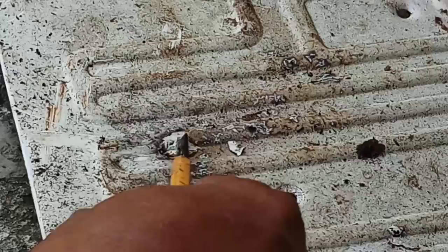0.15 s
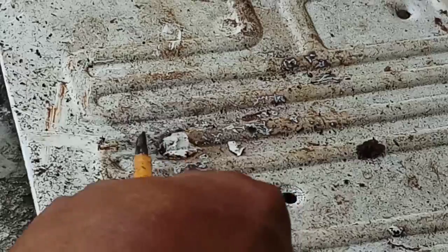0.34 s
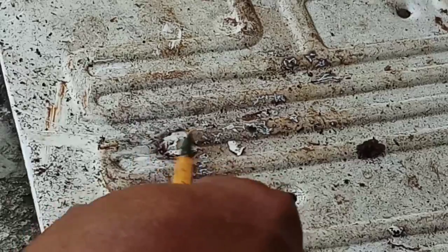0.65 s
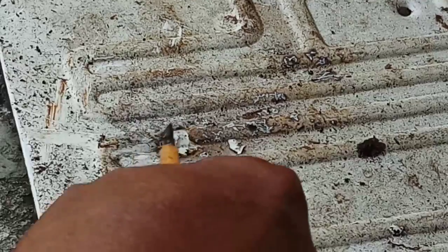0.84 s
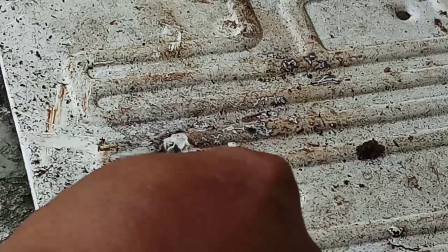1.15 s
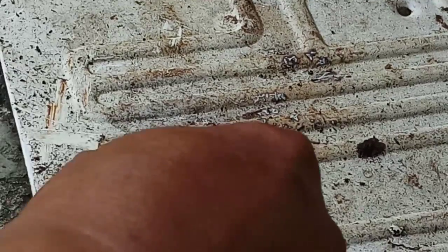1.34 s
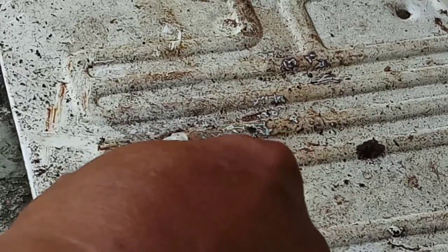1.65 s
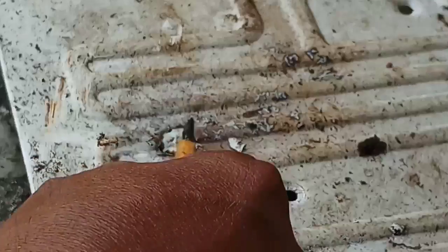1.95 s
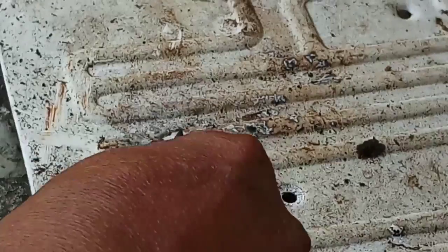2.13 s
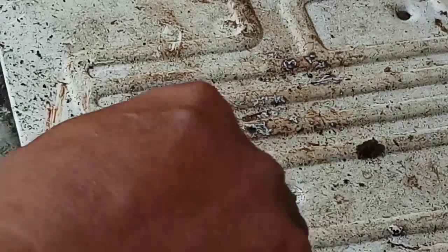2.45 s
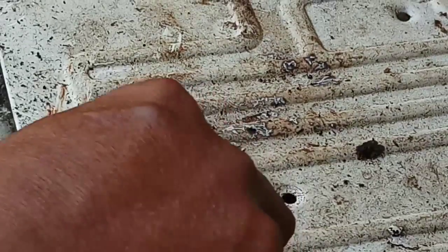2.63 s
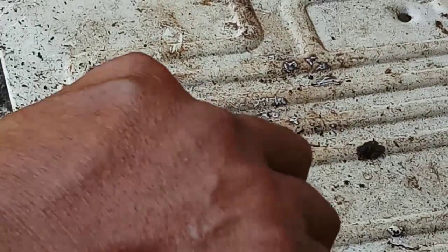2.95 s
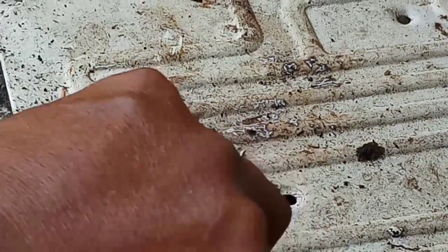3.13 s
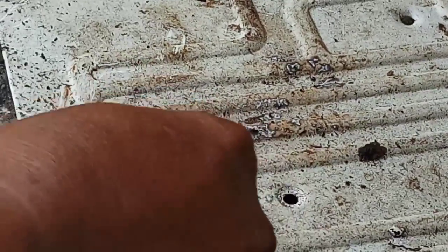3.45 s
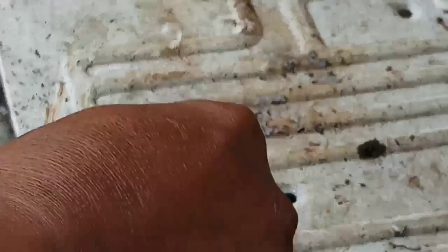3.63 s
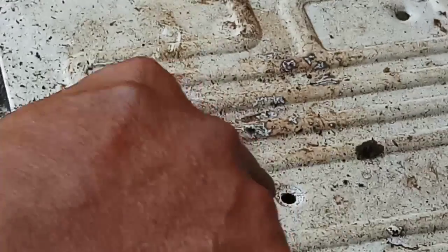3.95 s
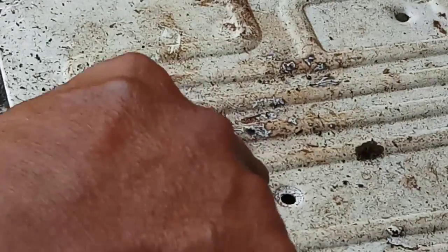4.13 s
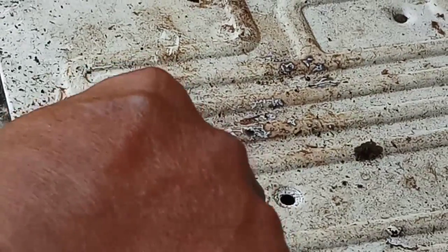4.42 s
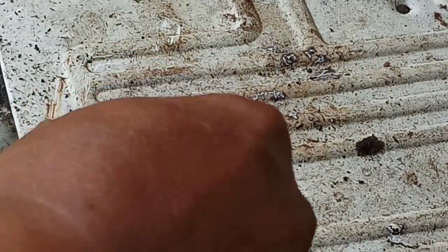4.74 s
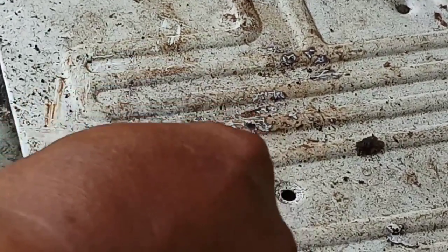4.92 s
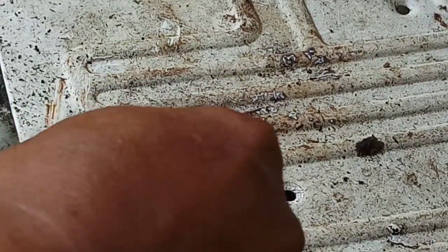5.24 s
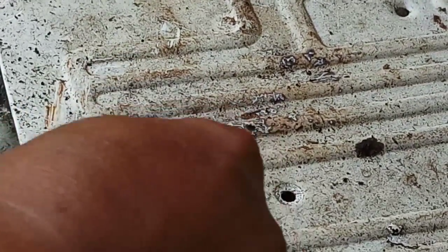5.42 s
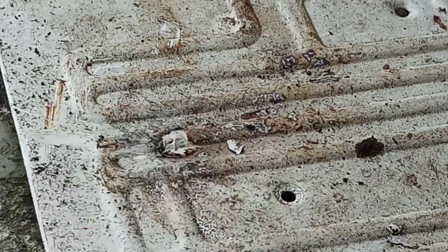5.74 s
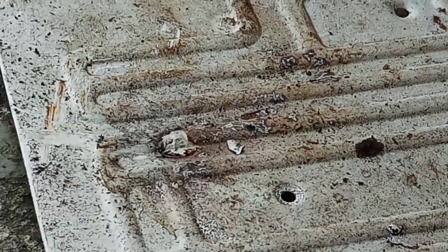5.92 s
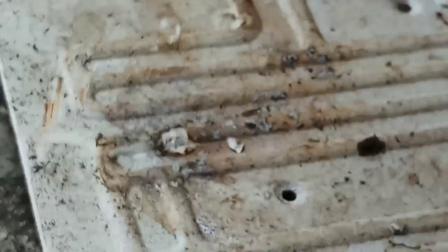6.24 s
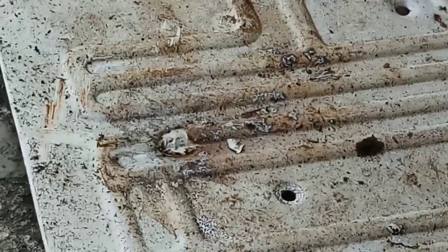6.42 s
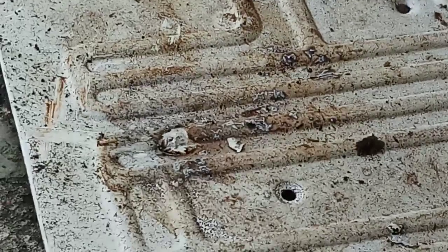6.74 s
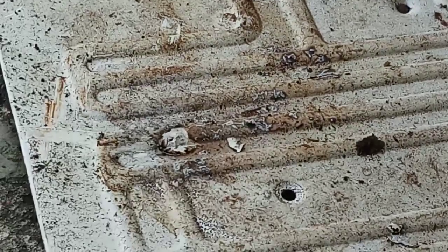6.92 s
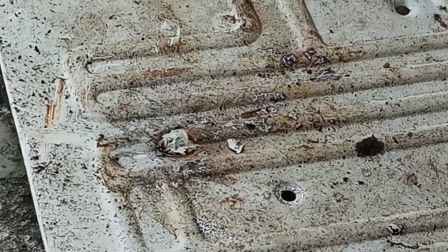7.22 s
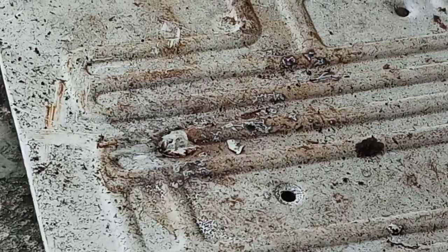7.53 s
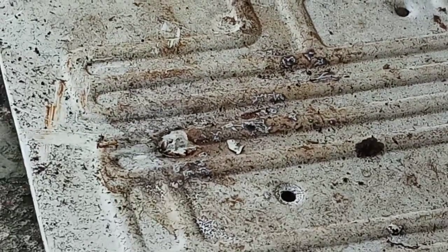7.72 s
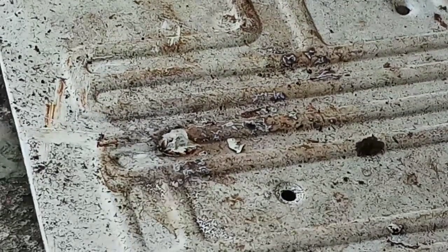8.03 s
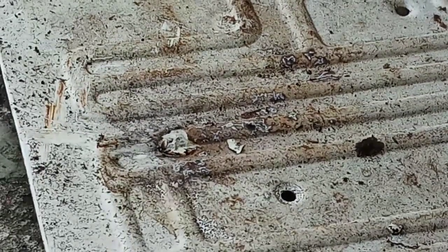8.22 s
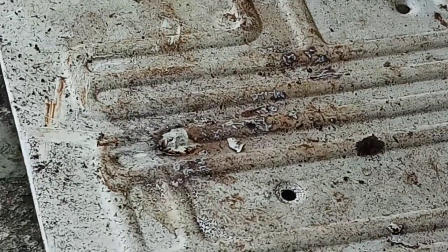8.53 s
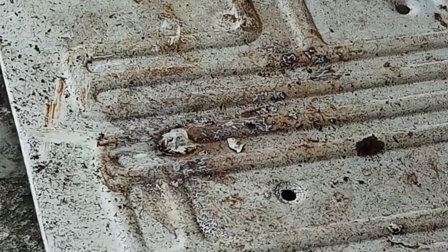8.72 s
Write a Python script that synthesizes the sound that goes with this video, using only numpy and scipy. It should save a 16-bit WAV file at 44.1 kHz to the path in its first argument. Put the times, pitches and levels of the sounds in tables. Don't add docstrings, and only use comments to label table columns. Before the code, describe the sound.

A steady, slightly fluttering cricket trill dominates a quiet yard, over light hiss, breeze rumble and distant hum. Very high, thin chirps repeat early and then stop. A hand works a small tool on cast metal: sparse dry ticks and short gritty drags at first, a busy flurry around five seconds, then scattered faint touches and light rustling. The level is low and the microphone close to the plate.

```python
import sys
import numpy as np
from scipy import signal
from scipy.fft import rfft, irfft, next_fast_len
from scipy.io import wavfile
from scipy.ndimage import uniform_filter1d

SR = 44100
rng = np.random.default_rng(int(sys.argv[2]) if len(sys.argv) > 2 else 0)


def generate_wav(signal):
    frames = np.transpose(np.atleast_2d(signal))
    scaled = np.clip(frames, -1, 1) * 32767
    pcm = np.round(scaled).astype(np.int16)
    wavfile.write(sys.argv[1], SR, pcm)


def to_linear_factor(level_db):
    exponent = np.asarray(level_db, float) / 20
    return 10 ** exponent


N = 391166
T = np.arange(N) / SR


def level(x, db):
    return x * to_linear_factor(db) / np.sqrt(np.mean(x ** 2))


def walk(rate):
    hold = int(SR / rate)
    steps = np.repeat(rng.standard_normal(N // hold + 1), hold)[:N]
    return level(uniform_filter1d(uniform_filter1d(steps, hold), hold), 0)


def coloured(spectrum):
    hz, db = np.transpose(spectrum)
    size = next_fast_len(N)
    f = np.arange(size // 2 + 1) * SR / size + 1e-9
    gain = to_linear_factor(np.interp(np.log(f), np.log(hz), db, -150, -150))
    return level(irfft(rfft(rng.standard_normal(size)) * gain, size)[:N], 0)


def ring(x, hz, width_hz):
    edges = np.clip([hz - width_hz / 2, hz + width_hz / 2], 15, .45 * SR)
    return signal.sosfilt(signal.butter(2, edges, "bandpass", fs=SR, output="sos"), x)


def swells(events):
    return sum(db * np.exp(-((T - s) / half_s) ** 2) for s, half_s, db in events)


# (pitch [Hz], level per Hz [dB])
RUMBLE = [(12, -63), (20, -1), (38, -2), (54, -0.5), (121, 0.5), (260, -9), (340, -17), (570, -120)]
LOW_HUM = [(170, 1.5), (210, -3), (390, -1), (560, -7), (700, -26.5)]
UPPER_HUM = [(500, -24), (620, -1.5), (950, -3.5), (1400, -8.5), (1850, 0), (2100, -16)]
RUSTLE = [(2500, 6.5), (3100, -6.5), (3500, 3), (4000, -5), (5000, -3.5), (6000, -3.5), (8000, -10.5),
          (9500, -33)]
HISS = [(2600, 1), (2800, 3), (4600, 0.5), (6400, -12.5), (6900, 1.5), (7300, -7), (7700, -10), (8900, 0.5),
        (9600, -9), (15800, -11.5)]
# (centre [s], half length [s], strength [dB])
GUSTS = [(.6, .22, 6), (1.0, .2, 4.5), (3.0, .15, 2.5), (3.88, .15, 4), (4.62, .1, 2), (5.42, .1, 5),
         (5.72, .14, 3.5), (6.45, .12, 3.5), (7.3, .2, 2.5), (8.3, .2, 1.5)]
# (centre [s], half length [s], strength [dB])
HAND = [(.6, 0.19, 4.5), (2.45, 0.074, 0.5), (3.22, .08, 1), (4.35, .12, -1), (5.48, 0.037, 5),
        (5.9, 0.22, 0), (6.85, 0.11, 3), (7.3, 0.25, 3), (8.42, 0.07, 1.5)]
CALM_DB = [-67, -73, -73.5, -71.5]
GUST_SHARE = [0.42, 1.33, .6, 0.076]
HAND_SHARE = [0.41, 0.049, 0.38, 1.7]


def air():
    gust, hand = swells(GUSTS), swells(HAND)
    shares = zip(CALM_DB, GUST_SHARE, HAND_SHARE)
    rumble_db, low_db, upper_db, rustle_db = (db + g * gust + h * hand for db, g, h in shares)
    rumble = coloured(RUMBLE) * to_linear_factor(rumble_db + 1.1 * walk(9.3))
    hum = coloured(LOW_HUM) * to_linear_factor(low_db + 1.2 * walk(11))
    hum += coloured(UPPER_HUM) * to_linear_factor(upper_db + .6 * walk(13))
    crackle = 1 + 75 * uniform_filter1d(rng.random(N) ** 3000, size=60)
    rustle = coloured(RUSTLE) * to_linear_factor(rustle_db + 1.5 * walk(9.1)) * crackle
    hiss = level(coloured(HISS), -67.5)
    return rumble + hum + rustle + hiss


# (pitch [Hz], width [Hz], level [dB])
THIN_LINES = [(4482, 35, -79.5), (2915, 30, -84), (1900, 24, -74), (1990, 24, -74), (1797, 27, -85),
              (49, 10, -71)]


def far_tones():
    return sum(level(ring(rng.standard_normal(N), hz, width), db) for hz, width, db in THIN_LINES)


# (pitch [Hz], peak level [dB])
CHIRP_NOTES = [(8430, -74), (8340, -78)]


def chirper():
    first_s, period_s, count, half_s = .085, .1517, 24, .05
    pause_s, pause_after = .04, 20
    k = np.arange(count)
    centres = first_s + period_s * k + pause_s * (k > pause_after)
    chirps = sum(np.exp(-((T - s) / half_s) ** 4) for s in centres)
    fade_db = np.interp(T, [2.9, 3.7], [0, -3])
    notes = 0
    for hz, db in CHIRP_NOTES:
        phase = 2 * np.pi * np.cumsum(hz + 30 * walk(60)) / SR
        notes = notes + to_linear_factor(db) * np.sin(phase)
    return chirps * to_linear_factor(fade_db + walk(9)) * notes


TRIPLET_DB = [-59.5, -71.5, -70.5, -72]
TRIPLET_PIP_S = [.00065, .0009, .0009, .0009]


def triplets():
    rate, first_s, gap_s = 22.693, .0122, .00367
    strike_hz, wing_hz = 3587, 3633
    cycle, at = np.divmod(T * rate, 1)
    since = at / rate - first_s
    centre = gap_s * np.clip(np.round(since / gap_s), 0, 2)
    from_pip = since - centre
    chance = rng.standard_normal((int(cycle[-1]) + 1, 3))[cycle.astype(int)].T
    turns = (strike_hz + 7 * chance[1]) * centre + wing_hz * from_pip + .13 * chance[2]
    pips = 0
    for k, (db, half_s) in enumerate(zip(TRIPLET_DB, TRIPLET_PIP_S), 1):
        pips = pips + to_linear_factor(db) * np.exp(-(from_pip / half_s) ** 2) * np.sin(2 * np.pi * k * turns)
    return pips * to_linear_factor(1.3 * chance[0])


# (start [s], length [s])
SCRAPE_TIMES = [(.1, .06), (.5, .11), (.58, .04), (.85, .07), (4.21, .18), (4.24, .05), (4.33, .12),
                (4.43, .11), (4.438, .09), (4.438, .09), (4.445, .18), (4.48, .045), (4.57, .14),
                (4.62, .05), (5.455, .04), (5.455, .04), (6.7, .06), (7.03, .05), (7.23, .1), (7.23, .1),
                (7.47, .03), (7.47, .03), (6.075, .04), (5.36, .015)]
# (pitch [Hz], width [Hz], level [dB], grains per second [1/s])
SCRAPES = [(5500, 5800, -64, 980), (13000, 1400, -73, 900), (54, 41, -59, 36), (5500, 4200, -67, 600),
           (4880, 520, -62, 250), (116, 93, -56.5, 110), (4800, 600, -72, 98), (3400, 610, -62.5, 180),
           (10300, 900, -62.5, 400), (8700, 1500, -69, 260), (4870, 740, -61, 140), (7900, 470, -68, 410),
           (4830, 600, -70, 211), (1370, 360, -66.5, 360), (1340, 480, -60, 450), (3450, 1200, -58.5, 1200),
           (3270, 1300, -62.5, 340), (1000, 840, -72, 460), (1100, 400, -68.5, 220), (1680, 170, -69, 270),
           (600, 160, -68, 200), (1260, 500, -68, 300), (1300, 500, -66, 280), (500, 510, -62, 200)]


def scrapes():
    out = np.zeros(N + SR)
    t = T[:SR // 4]
    for (s, length), (hz, width, db, rate) in zip(SCRAPE_TIMES, SCRAPES):
        chance = rng.standard_normal((2, len(t)))
        grain_rate = rate * (1 + 5.8 * uniform_filter1d(chance[0], size=300))
        beat = np.cos(2 * np.pi * np.cumsum(grain_rate) / SR)
        rough = level(ring(chance[1] * (9 + beat) ** 2, hz, width), db)
        shape = abs(np.sin(np.pi * np.minimum(t / length, 1) ** .75)) ** .8
        i = int(s * SR)
        out[i:i + len(t)] += ring(rough * shape, hz, 1.64 * width)
    return out[:N]


# (time [s], peak level [dB], low ring against main [dB], brightness [dB])
TICKS = [(0.1214, -46, -11, -12), (0.7282, -48, -5, -11), (0.863, -50, -14, -6), (0.97, -57, -18, 3),
         (1.331, -61, -10, 11), (1.4212, -59, -18, -3), (2.4624, -58, -15, 1), (2.7514, -53, -7, 2),
         (3.1728, -43.5, -25, -1.5), (4.6369, -47, -19, -12), (4.6654, -54, -3, -9),
         (4.763, -47, -3.5, -12), (4.7842, -47, -9, -11), (4.791, -46.5, -1.5, -7), (4.809, -51, -4, -15),
         (4.983, -43, -15, -15), (5.031, -58.5, 4, -11), (5.2106, -58, -18, -16), (5.3624, -59, 3, -10),
         (5.4615, -49, -18, -21), (5.4744, -48, -7, -9), (5.4824, -44, -10, -8), (5.487, -44, -6, -25),
         (5.5034, -52, -1, -18), (6.0856, -52, -4, -6), (6.7053, -65, -20, -16), (7.48, -47.5, -1, -14),
         (7.8925, -59, 2, -14), (8.2521, -57, -19, -14), (8.4417, -51, -9, -16)]
# (pitch [Hz], width [Hz], time to fall 60 dB [s])
PLATE = [(1150, 1100, .013), (3500, 1600, .012), (6200, 3000, .009), (9200, 4000, .007),
         (13500, 5000, .004)]


def ticks():
    out = np.zeros(N + 4096)
    t = T[:4096]
    for s, db, low_db, top_db in TICKS:
        upper_db = -6 + .55 * top_db
        ring_levels = (low_db, 0, upper_db, top_db, top_db - 9)
        i = int((s + .0007) * SR)
        for (hz, width, t60), rel_db in zip(PLATE, ring_levels):
            crack = ring(rng.standard_normal(len(t)) * to_linear_factor(-60 * t / t60), hz, width)
            out[i:i + len(t)] += 1.02 * to_linear_factor(db + rel_db) * crack / abs(crack).max()
    return out[:N]


# (wing note [Hz], strokes per second [1/s])
SINGERS = [(2294, 126.0), (2321, 130.0), (2258, 88.3), (2425, 111.0), (2045, 132.6), (1989, 91.5)]
# (level [dB], pitch wander [Hz], sounding share of a stroke [0-1], ring between strokes [ratio])
VOICES = [(-55.5, 12, .62, 0), (-50, 9, 1, .8), (-54, 13, 1, 1.1), (-57, 18, 1, .6), (-75, 13, .33, 0),
          (-74, 13, .8, .3)]
# (multiple [ratio], level [dB])
OVERTONES = [(2, -34), (3, -36.5), (4, -69)]
BURROW_HZ = [1870, 2680]
# (pitch [Hz], level per Hz [dB])
FAR_CHORUS = [(1850, -40), (1890, -24), (2080, -22), (2140, -15), (2165, -7), (2225, -8), (2255, -5),
              (2345, -2), (2380, -7), (2420, -6), (2520, -14), (2630, -19), (2660, -28), (2740, -33)]
# (time [s], level [dB])
CHORUS = [(0, 0), (.3, -2), (.9, -1), (1.3, -1), (1.7, -1), (2.2, 0), (2.7, -0.5), (3.2, -1), (3.8, -1),
          (4.45, -1), (5.2, -0.7), (5.65, -0.5), (6.3, -1.5), (6.75, 0), (7.2, -1.5), (7.7, -1.5),
          (8.1, -1), (8.87, -1)]


def chorus():
    notes, overtones = 0, 0
    for (hz, rate), (db, wander_hz, share, sustain) in zip(SINGERS, VOICES):
        stroke = (rate * T + rng.random() + .074 * walk(1.466)) % 1 / np.clip(share, .2, 1)
        wing = sustain + np.sin(np.pi * np.minimum(stroke, 1)) ** 2
        swell = level(wing * to_linear_factor(.8 * walk(25)), db + 3)
        phase = 2 * np.pi * np.cumsum(hz + wander_hz * walk(45)) / SR
        notes = notes + swell * np.sin(phase)
        overtones = overtones + swell * sum(to_linear_factor(d) * np.sin(k * phase) for k, d in OVERTONES)
    burrow = signal.butter(4, BURROW_HZ, "bandpass", fs=SR, output="sos")
    near = overtones + signal.sosfilt(burrow, notes)
    tail = rng.standard_normal(SR // 2) * to_linear_factor(-60 * T[:SR // 2] / .2)
    echo = signal.fftconvolve(near, tail / np.linalg.norm(tail))[:N]
    far = level(coloured(FAR_CHORUS), -48.8)
    flicker_db = .7 * walk(12)
    slow_db = np.interp(T, *np.transpose(CHORUS)) + flicker_db
    return (near + to_linear_factor(-11) * echo + far) * to_linear_factor(slow_db + .97)


def scene():
    insects = far_tones() + chirper() + triplets() + chorus()
    return (air() + insects + scrapes() + ticks())[None]


def roll_off(x):
    return signal.sosfilt(signal.butter(12, 15690, fs=SR, output="sos"), x)


def record(dry):
    top_cut = signal.ellip(8, .2, 60, 15590, fs=SR, output="sos")
    mix = signal.sosfilt(top_cut, dry)
    return roll_off(mix)


dry = scene()
out = record(dry)
generate_wav(out)
```